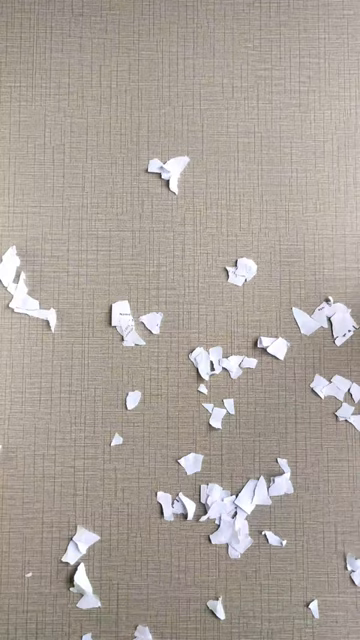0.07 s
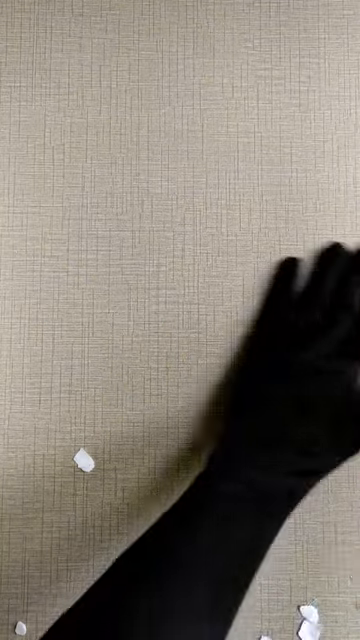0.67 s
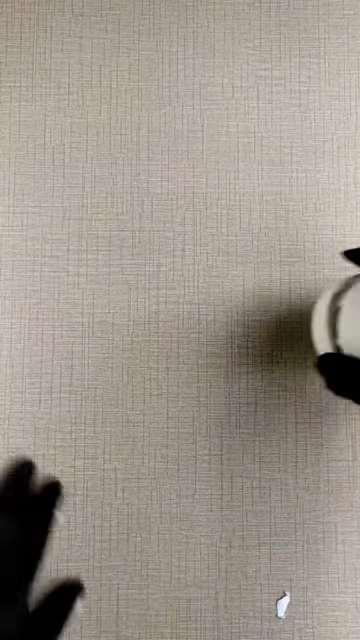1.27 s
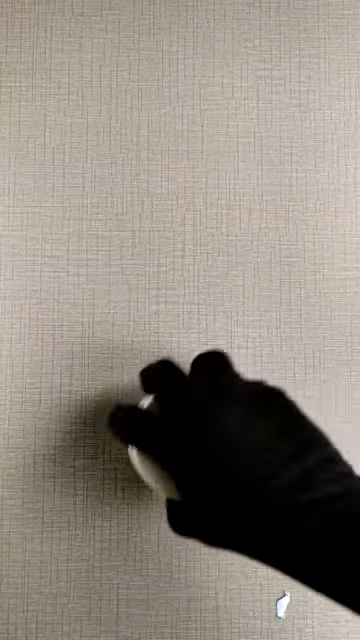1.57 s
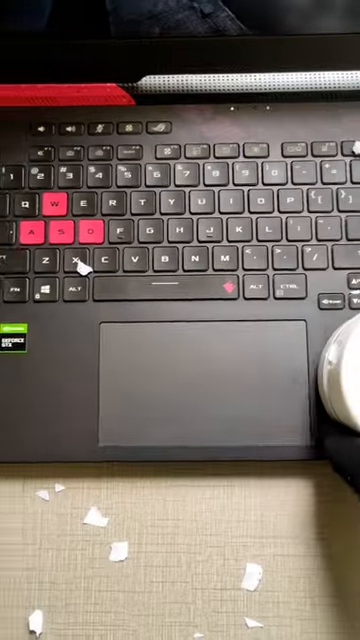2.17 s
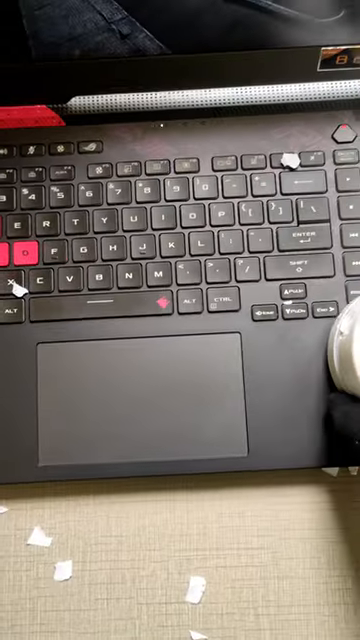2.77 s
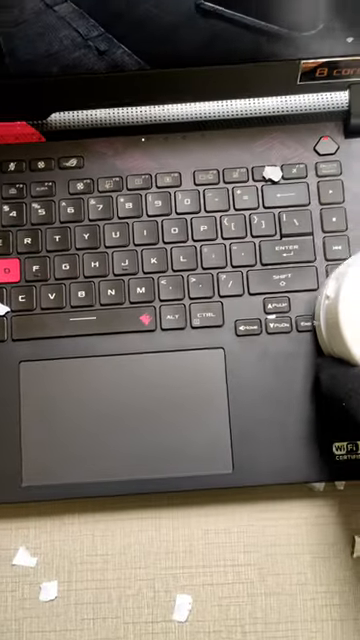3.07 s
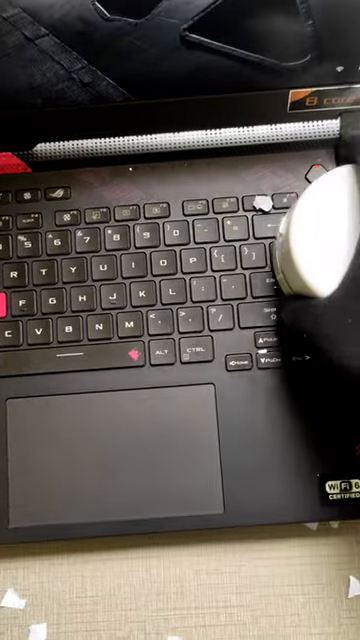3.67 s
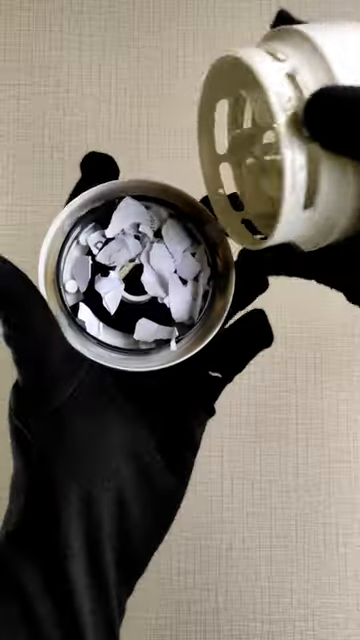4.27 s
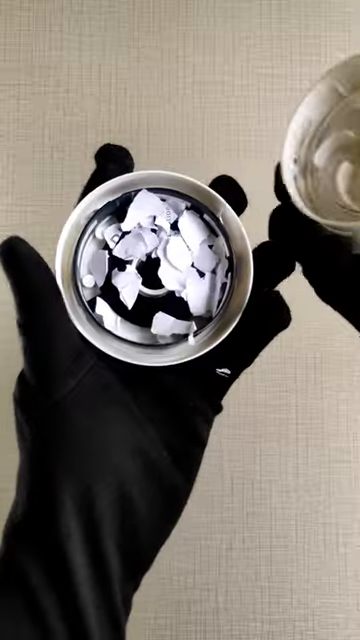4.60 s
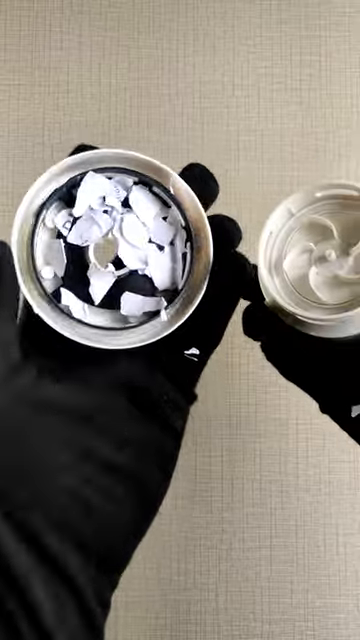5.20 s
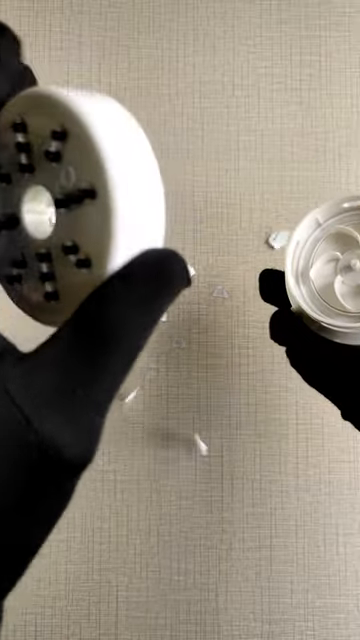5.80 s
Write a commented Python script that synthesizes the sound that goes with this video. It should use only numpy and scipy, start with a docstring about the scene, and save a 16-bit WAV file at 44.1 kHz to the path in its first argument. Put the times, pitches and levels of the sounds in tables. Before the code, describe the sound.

Heard up close in a quiet room, the airy hiss of a palm-sized vacuum is joined by a bright, grainy rattle of paper bits spinning in a plastic cup. The brush scrubs and squeaks over a desk, where the housing thumps softly, and then over a laptop keyboard. Hiss and rattle cut off together. The scraps shift faintly, and near the end they spill out in a short, soft patter.

```python
"""A desk in a quiet room: a palm-sized vacuum hisses in the air, then sweeps paper scraps off the desk
and along a laptop. The scraps whirl, rustle and clack in the plastic dust cup, ringing its wall and air;
the brush scrubs and squeaks, and the housing bumps the desk top into a soft boom. The fan stops, the cup
is tipped out and the scraps patter down. One close echo colours everything."""
import sys
import numpy as np
from scipy import signal
from scipy.fft import rfft, irfft, next_fast_len
from scipy.io import wavfile
from scipy.ndimage import uniform_filter1d

SR = 44100
rng = np.random.default_rng(int(sys.argv[2]) if len(sys.argv) > 2 else 0)


def unload_audio(sound):
    """Save the sound as a 16-bit wav file, at the path given as the first command line argument."""
    columns = np.transpose(np.atleast_2d(sound))
    # keep every value between -1 and 1, then stretch to whole-number steps
    steps = np.round(np.clip(columns, -1, 1) * 32767)
    wavfile.write(sys.argv[1], SR, steps.astype(np.int16))


N = 266584
SWEEP_S, LAPTOP_S, STOP_S = 0.606, 2.132, 4.122
CROSSFADE_S = 0.027  # from desk to laptop


def sweeping():
    """Whirling scraps rustle and ring the cup's wall and air; the scrubbing brush rings the housing."""
    scraps = contacts(per_s=300, spread_db=2.4, grain_s=0.0025, smooth_share=0.25)
    bristles = contacts(per_s=660, spread_db=3.5, grain_s=0.00086, smooth_share=0.25)
    rattle = rustle(scraps) + cup_wall(scraps) + brush(bristles) + cup_air(scraps)
    return butter(rattle, 350, "high")


# Level ride of the scraps circling in the cup: time_s, level_db
CHURN_RIDE = [(.62, -28.5), (.89, -31), (1.12, -27), (1.3, -25), (1.42, -28.5), (1.6, -25), (1.86, -29.5),
              (2.12, -27), (2.4, -23), (2.8, -28.5), (2.87, -23.5), (3.12, -24), (3.29, -21.5), (3.52, -30),
              (3.68, -25), (4.03, -29)]
# Clumps sucked in: start_s, level_db, length_s, wall_send_db
CLUMP_GULPS = [(0.762, -23.5, 0.076, 3), (0.915, -34.5, 0.018, 16), (0.958, -28, 0.052, -17),
               (1.055, -26, 0.036, 1.5), (1.165, -25.5, 0.062, -1), (1.225, -26, 0.048, -2.5),
               (1.321, -28.5, 0.059, 7.5), (1.617, -24.5, 0.035, 3.5), (1.916, -25.5, 0.11, 7),
               (2.136, -21, 0.025, 3), (2.342, -22.5, 0.056, -15), (2.832, -25.5, 0.034, 11.5),
               (2.984, -25, 0.045, 7), (3.358, -34.5, 0.1, 20), (3.538, -35, 0.041, 14.5),
               (3.806, -27, 0.043, 11), (3.94, -35.5, 0.042, 15.5), (4.053, -30, 0.063, 9)]
def suction():
    """Airflow churns the scraps and gulps in clumps: gains of churn, gulps and gulps on the wall."""
    gulps, wall_gulps = 0, 0
    for start_s, level_db, length_s, wall_send_db in CLUMP_GULPS:
        gulp = from_db(level_db) * swell(start_s, length_s, attack_s=0.012, release_s=0.02)
        gulps += gulp
        wall_gulps += from_db(wall_send_db) * gulp
    return from_db(ride(CHURN_RIDE)), gulps, wall_gulps


# Paper EQ on each surface: freq_hz, left_db, right_db
DESK_RUSTLE_EQ = [(351, -11.5, -17), (776, -20, -15.5), (2220, 10, 3.5), (2750, 15.5, 11), (3200, 12.5, 10),
                  (3900, 8.5, 3.5), (4240, 11.5, 7), (4950, 8.5, 1), (5196, 5, 10), (5185, 9.5, -2),
                  (7160, 6, 6.5), (8380, 12.5, -4), (10250, 5, -8), (12820, -0.5, -8), (14460, -14, -27.5)]
LAPTOP_RUSTLE_EQ = [(402, -24, -22.5), (760, -1, -21), (2340, -1.5, 11), (3620, 12.5, 11.5), (4150, -14, 9),
                    (5360, 14.5, 15.5), (6160, -17, 12.5), (7260, -0.5, 16), (7980, 6, 0), (8400, -2, 0),
                    (10370, -10.5, -2), (14000, -11.5, -6.5)]
def rustle(scraps):
    """Whirling paper makes a bright, grainy rustle flecked with ticks."""
    churn, gulps, _ = suction()
    ticks = paper_ticks(per_s=420, spread_db=3.0, t60_s=.027)
    grains = nozzle_gap(scraps * stereo_noise(0.19) + .6 * ticks)
    desk = from_db(-1.5) * coloured(grains, DESK_RUSTLE_EQ) * panned(0.62 * (position() - 7.5))
    laptop = from_db(-4.5) * coloured(grains, LAPTOP_RUSTLE_EQ) * panned(0.34 * (position() + 9.5))
    return np.hypot(churn, gulps) * desk_to_laptop(desk, laptop)


# High overtones of the cup: pitch_hz
TICK_PITCHES = [3765, 4415, 4545, 4740, 5606, 5935, 6138, 6353, 6900, 8510, 9040, 11200]
def paper_ticks(per_s, spread_db, t60_s):
    """Stiff paper corners tick on the plastic, each ringing one overtone; rms 1."""
    count = int(per_s * N / SR)
    when, spot, size, life, *phases = rng.random((4000, 6))[:count].T[:, :, None]
    age = np.arange(SR // 40) / SR
    hz = np.array(TICK_PITCHES)[(spot * len(TICK_PITCHES)).astype(int)]
    hz = hz * (1 + .015 * rng.standard_normal(hz.shape))  # slight detune
    fade = from_db(-spread_db * np.log(size + .02) - 60 * age / (t60_s * (.5 + life)))
    samples = (when * N).astype(int) + np.arange(len(age))
    sides = [fade * np.sin(2 * np.pi * (hz * age + phase)) for phase in phases]
    return rms_one(np.array([np.bincount(samples.ravel(), side.ravel(), N)[:N] for side in sides]))


# Cup wall modes on each surface: pitch_hz, width_hz, level_db
DESK_WALL_MODES = [(4310, 48, 2), (4907, 53, 5), (4950, 91, 4)]
LAPTOP_WALL_MODES = [(4215, 70, 2), (4320, 85, 4), (4540, 280, 2), (4830, 130, 0), (4965, 50, -1)]
def cup_wall(scraps):
    """Scraps pelt the plastic wall and keep it ringing."""
    churn, _, wall_gulps = suction()
    level = np.hypot(surface_gain(desk_db=-1, laptop_db=4) * churn, wall_gulps)
    desk = from_db(-3.5) * body(DESK_WALL_MODES, scraps, alike=0.49) * panned(1.5)
    laptop = from_db(-5.0) * body(LAPTOP_WALL_MODES, scraps, alike=0.11) * panned(-4.5)
    return level * desk_to_laptop(desk, laptop)


# Air modes of the cup at rest: pitch_hz, width_hz, level_db
AIR_MODES = [(2852, 85, -4), (3020, 96, 5.5), (3110, 64, 4)]
# Their centre glides as the nozzle tilts and fills: time_s, pitch_hz
AIR_GLIDE = [(.62, 2953), (1.45, 2967), (1.65, 3029), (2.1, 3090), (2.3, 3010), (4.1, 2982)]
AIR_REST_HZ = 3010
def cup_air(scraps):
    """The air in the cup rings with the churn and gulps, and is pumped by each shove."""
    churn, gulps, _ = suction()
    whirl = np.hypot(churn, 0.86 * gulps) * surface_gain(desk_db=1.5, laptop_db=-4)
    pumping = shoves() * surface_gain(desk_db=7, laptop_db=-5.5)
    level = np.hypot(whirl, pumping) * from_db(-3.0 + 1.2 * drift(20))
    ring = level * body(AIR_MODES, scraps, alike=0.13) * panned(0.74 * position() + 0.71)
    glide = np.exp(2j * np.pi * np.cumsum(ride(AIR_GLIDE) - AIR_REST_HZ) / SR)  # frequency shift
    return np.real(signal.hilbert(ring, next_fast_len(N))[:, :N] * glide)


# Larger scraps hitting the cup: start_s, level_db, pitch_hz, ring_t60_s
SCRAP_HITS = [(.7615, -6, 4950, 0.057), (0.9165, -12.5, 4857, 0.12), (0.9643, -16, 3010, .04),
              (1.072, -8, 3100, 0.026), (1.2639, -8.5, 4930, 0.024), (1.4973, -6, 4950, 0.031),
              (1.556, -12, 4950, 0.04), (1.6291, -10.5, 3020, 0.14), (1.9113, -12.5, 3010, 0.072),
              (1.949, -9, 3110, 0.073), (2.9473, -18, 4396, 0.026), (3.0023, -8, 4280, .04),
              (3.0589, -10.5, 3780, 0.027), (3.1367, -27, 5400, .02), (3.3828, -5, 4310, 0.011),
              (3.39, -6.5, 4310, 0.035), (3.4262, -15, 4205, 0.05), (3.732, -12, 4740, 0.047)]
def strikes(clack_db, ring_db):
    """A larger scrap hits the cup: a short, round clack and one strong ring."""
    clacks = sum(from_db(db) * burst(s, t60 / 2) for s, db, _, t60 in SCRAP_HITS) * stereo_noise(.3)
    clacks = butter(butter(clacks, [2600, 7800]), [2600, 7800])
    rings = sum(from_db(db) * burst(s, t60, hz) for s, db, hz, t60 in SCRAP_HITS)
    rings = butter(rings, [2000, 7000])
    return (from_db(clack_db) * clacks + from_db(ring_db) * rings) * panned(0.51 * position())


# How hard the brush bears down: time_s, level_db
PRESSURE_RIDE = [(.62, -36), (.92, -53), (1.2, -41), (1.55, -35), (1.7, -28), (2.1, -33.5), (2.4, -29),
                 (2.76, -39.5), (3.3, -38.5), (3.5, -27.5), (3.85, -33.5), (4.1, -32)]
# Housing modes on each surface: pitch_hz, width_hz, level_db
DESK_HOUSING = [(887, 31, -15), (1145, 50, -6.5), (1425, 18, -12.5), (1417, 44, -4), (1513, 290, -9),
                (2020, 73, -8)]
LAPTOP_HOUSING = [(866, 30, -10), (1172, 85, 1.5), (1321, 39, 6), (1503, 73, 5), (1958, 68, 3),
                  (2130, 52, 2)]
def brush(bristles):
    """Bristles scrub the surface and ring the housing, louder under pressure."""
    level = np.hypot(from_db(ride(PRESSURE_RIDE)), shoves())
    desk = from_db(-3.5) * body(DESK_HOUSING, bristles, alike=0.35, swing_db=7) * panned(.3)
    laptop = from_db(-1.07) * body(LAPTOP_HOUSING, bristles, alike=0.2, swing_db=7) * panned(-0.78)
    return level * desk_to_laptop(desk, laptop)


# Pushes of the brush: start_s, level_db, length_s
BRUSH_SHOVES = [(1.597, -24, 0.044), (1.716, -27.5, 0.021), (1.933, -34.5, 0.13), (2.326, -27.5, 0.059),
                (3.386, -28.5, 0.055)]
def shoves():
    """Gain that surges as the brush is shoved over the surface."""
    return sum(from_db(level_db) * swell(start_s, length_s, attack_s=0.027, release_s=0.018)
               for start_s, level_db, length_s in BRUSH_SHOVES)


# The brush rim or a caught scrap squeaks: centre_s, level_db, pitch_hz, length_s
SQUEAK_CUES = [(0.625, -30, 1410, 0.035), (0.791, -32, 1410, 0.073), (1.019, -34, 1450, 0.08),
               (1.632, -20, 3015, .055), (1.676, -33, 1185, 0.08), (1.732, -22.5, 3015, .045),
               (2.009, -32, 1290, 0.035), (2.72, -38, 1935, 0.14), (2.845, -13.5, 4312, .024),
               (2.92, -34, 1940, .1), (3.035, -33, 1940, 0.07), (3.413, -35, 865, 0.06),
               (3.425, -28, 1400, 0.06), (3.49, -24, 4312, .06), (3.672, -26, 4960, .035)]
def squeaks(wander_hz, rough_db):
    """Stick and slip holds one resonance of the housing or cup in a short, rough tone."""
    tones, t = 0, np.arange(N) / SR
    wander = np.cumsum(wander_hz * drift(150)) / SR
    for centre_s, level_db, pitch_hz, length_s in SQUEAK_CUES:
        arch = np.cos(np.pi * np.clip((t - centre_s) / length_s, -.5, .5))
        tones += from_db(level_db) * arch * np.sqrt(2) * np.sin(2 * np.pi * (pitch_hz * t + wander))
    roughness = from_db(rough_db * np.array([drift(150), drift(120)]))
    return tones * roughness * panned(.2 * position())


# Soft knocks on the desk, and one deep puff of air on the microphone: start_s, level_db, pitch_hz, t60_s
LOW_THUMPS = [(0.253, -31, 105, 0.1), (0.7, -31.5, 105, 0.27), (0.736, -27.5, 36.7, 0.5),
              (0.746, -24, 88.5, 0.15), (0.844, -25, 90.4, 0.18), (1.223, -25.5, 94, 0.14),
              (1.603, -26.5, 107, 0.34), (1.634, -20, 85.7, 0.24), (1.778, -37, 105, 0.43)]
# Upper desk modes: pitch_hz, level_db, t60_s
UPPER_DESK_MODES = [(251.5, -13.5, 0.14), (293.7, -12.5, 0.18)]
def thumps(attack_s):
    """Soft desk knocks and one puff of air boom low, with a dull shudder under the ring."""
    boom, shudder = 0, 0
    for start_s, level_db, pitch_hz, t60_s in LOW_THUMPS:
        firmness = min(t60_s / 0.17, 1) ** 2  # a damped thump hardly reaches the upper modes
        upper = sum(from_db(db) * burst(start_s, t60, hz) for hz, db, t60 in UPPER_DESK_MODES)
        ring = burst(start_s, t60_s, pitch_hz) + firmness * upper
        boom += from_db(level_db) * ring * fade_in(start_s + attack_s / 2, attack_s)
        shudder += from_db(level_db) * burst(start_s, 2.1 * t60_s)
    shudder = butter(shudder * stereo_noise(0.15), [68, 170])
    return (butter(boom, [36, 300]) + from_db(9.0) * shudder) * panned(1.2)


# Level ride of the patter: time_s, level_db
POUR_RIDE = [(4.12, -63), (4.218, -61.5), (4.3, -77.5), (5.803, -73.5), (5.808, -59), (5.818, -47.5),
             (5.853, -55.5), (5.861, -48.5), (5.92, -59.5), (6.04, -64)]
# Patter EQ: freq_hz, left_db, right_db
POUR_EQ = [(694, 4.5, -4.5), (1504, -3, 10.5), (2200, -1, 2.5), (2928, 10.5, 8.5), (3660, 4.5, 5.5),
           (4300, 13, 13.5), (6000, 3.5, 8.5), (7300, -1, 13), (9010, 6, -1.5), (14100, -12, -6)]
def pouring():
    """Loose scraps shift in the cup, then slide out and patter onto the desk."""
    patter = contacts(per_s=1500, spread_db=2.5, grain_s=0.00066, smooth_share=.35)
    return coloured(from_db(ride(POUR_RIDE)) * patter * stereo_noise(.15), POUR_EQ)


# Air hiss EQ: freq_hz, left_db, right_db
FAN_EQ = [(280, -41, -42), (750, -41, -41.5), (2530, -40, -40.5), (2848, -36.5, -34.5), (3500, -42, -42.5),
          (5100, -42, -40.5), (6500, -44, -46), (7470, -44, -48), (8930, -38, -51), (9900, -50, -51),
          (11510, -49, -58), (14000, -56, -57)]
# Vent whistles: pitch_hz, width_hz, left_db, right_db
VENT_WHISTLES = [(955, 55, -65, -61.5), (1202, 25, -62, -66), (1270, 24, -51, -60.5),
                 (2940, 36, -56, -63.5), (3120, 30, -61, -61.5), (8300, 45, -52.5, -61.5)]
def fan():
    """Air rushes through the impeller and whistles faintly in the vents."""
    air = coloured(stereo_noise(0.3), FAN_EQ) * from_db(1.5 + drift(12))
    for pitch_hz, width_hz, left_db, right_db in VENT_WHISTLES:
        whistle = rms_one(steep_resonance(stereo_noise(0.056), pitch_hz, width_hz))
        air += from_db([[left_db], [right_db]]) * whistle
    return air


# Room tone EQ: freq_hz, left_db, right_db
ROOM_EQ = [(25, -33, -29), (60.04, -25, -24.5), (105, -35, -19.5), (180, -35.5, -32), (406, -42, -45.5),
           (906, -57, -49.5), (1380, -48, -47.5), (2548, -65, -61.5), (2860, -55.5, -51.5),
           (3600, -67.5, -63), (4400, -57, -57), (6570, -75, -62.5), (9520, -77.5, -71.5),
           (13440, -83, -64.5)]
def room():
    """A bed of low rumble and faint hiss."""
    return from_db(-1.6) * coloured(stereo_noise(0.29), ROOM_EQ)


# Reflections between nozzle and surface: delay_s, gain
GAP_REFLECTIONS = [(.0011, .45), (.0027, -.5)]
def nozzle_gap(x):
    """The gap under the nozzle wobbles with the hand, so its reflections shift the colour; rms 1."""
    samples = np.arange(N)
    for delay_s, gain in GAP_REFLECTIONS:
        read = samples - delay_s * SR * (1 + .035 * drift(4))
        x = x + gain * np.array([np.interp(read, samples, side) for side in x])
    return rms_one(x)


# Bands the hollow housing swallows: freq_hz, width_hz
CAVITY_NOTCHES = [(2480, 380), (3400, 220)]
def cavity(x, depth):
    """The cavity cuts dips between its resonances."""
    for freq_hz, width_hz in CAVITY_NOTCHES:
        x = x - depth * resonance(x, freq_hz, width_hz)
    return x


# The vacuum's path from left to right: time_s, left_over_right_db
PAN_RIDE = [(.6, 2.5), (1.9, 4.5), (2.12, 10.5), (2.15, -6.5), (2.4, -8.5), (3.3, -12), (3.65, -19)]
def position():
    """The pan curve in dB, which each moving layer scales to its own width."""
    return ride(PAN_RIDE)


def desk_to_laptop(desk, laptop):
    """Equal-power crossfade; off to the right on the laptop, the sound reaches the left side later."""
    moved = fade_in(LAPTOP_S, CROSSFADE_S)
    laptop = np.array([delayed(laptop[0], 4 / SR), laptop[1]])
    return desk * np.sqrt(1 - moved) + laptop * np.sqrt(moved)


def surface_gain(desk_db, laptop_db):
    """One gain on the desk, another on the laptop."""
    return from_db(desk_db + fade_in(LAPTOP_S, CROSSFADE_S) * (laptop_db - desk_db))


def contacts(per_s, spread_db, grain_s, smooth_share):
    """Envelope of many tiny random impacts of uneven size over a steady rush; rms 1."""
    sizes = from_db(spread_db * np.minimum(rng.exponential(1, N), 4))
    clumping = from_db(4 * drift(35))
    hits = (rng.random(N) < per_s * clumping / SR) * sizes ** 2
    power = signal.lfilter([1], [1, -np.exp(-1 / (grain_s * SR))], hits + 1e-18)
    return np.sqrt(smooth_share + (1 - smooth_share) * power / power.mean())


def body(modes, impacts, alike, swing_db=4.2):
    """Impacts land on ever different spots, so each mode swells and fades on its own; rms 1."""
    out = 0
    for pitch_hz, width_hz, level_db in modes:
        ring = steep_resonance(impacts * stereo_noise(alike), pitch_hz, width_hz)
        out += ring * from_db(level_db + swing_db * drift(16))
    # the modes trade a steady supply of energy among themselves
    power = np.mean(out ** 2, axis=0)
    power = uniform_filter1d(uniform_filter1d(power, SR // 60), SR // 60)
    return out / np.sqrt(np.abs(power) + 1e-18)


def burst(start_s, t60_s, hz=0):
    """Sudden start, exponential decay; with a pitch, a ringing mode."""
    out, start = np.zeros(N), int(start_s * SR)
    age = np.arange(min(SR // 2, N - start)) / SR
    tone = np.sin(2 * np.pi * hz * age) if hz else 1
    out[start:start + len(age)] = from_db(-60 * age / t60_s) * tone
    return out + 1e-18


def swell(start_s, length_s, attack_s, release_s):
    """Quick rise, hold, exponential release."""
    past_end_s = np.maximum(np.arange(N) / SR - start_s - length_s, 0)
    return fade_in(start_s, attack_s) * np.exp(-np.minimum(past_end_s / release_s, 20))


def fade_in(centre_s, fade_s):
    """Rises from 0 to 1 around a moment."""
    return np.clip((np.arange(N) / SR - centre_s) / fade_s + .5, 0, 1)


def ride(points):
    """An automation curve at every sample, held flat beyond its ends."""
    return np.interp(np.arange(N) / SR, *np.transpose(points))


def drift(rate_hz):
    """Smooth random motion with spread 1."""
    knots = rng.standard_normal(N // 20)
    return np.interp(np.arange(N) / SR * rate_hz * 2, np.arange(len(knots)), knots) * np.sqrt(3 / 2)


def stereo_noise(alike):
    """White noise, partly shared by the two sides."""
    return np.sqrt(alike) * rng.standard_normal(N) + np.sqrt(1 - alike) * rng.standard_normal((2, N))


def coloured(x, eq):
    """Minimum-phase EQ with one curve for each side."""
    size = next_fast_len(N + SR // 4, real=True)
    size += size % 2
    hz, *sides = np.transpose(eq)
    log_hz = np.log(np.maximum(np.fft.rfftfreq(size, 1 / SR), 1))
    cepstrum = irfft([np.log(from_db(np.interp(log_hz, np.log(hz), side))) for side in sides])
    cepstrum[:, 1:size // 2] *= 2  # folding makes the filter causal
    cepstrum[:, size // 2 + 1:] = 0
    return irfft(rfft(x, size) * np.exp(rfft(cepstrum)))[:, :N]


def resonance(x, hz, width_hz):
    """Two-pole resonance with gain 1 on top."""
    radius = np.exp(-np.pi * width_hz / SR)
    feedback = [1, -2 * radius * np.cos(2 * np.pi * hz / SR), radius ** 2]
    return signal.lfilter(np.array([1, 0, -1]) * (1 - radius ** 2) / 2, feedback, x + 1e-18)


def steep_resonance(x, hz, width_hz):
    """Two double-width resonances in series, for steeper skirts."""
    return resonance(resonance(x, hz, 2 * width_hz), hz, 2 * width_hz)


def butter(x, edges_hz, kind="band"):
    """Gentle filter, 12 dB per octave."""
    return signal.sosfilt(signal.butter(2, edges_hz, kind, fs=SR, output="sos"), x)


def delayed(x, lag_s):
    """The same signal a little later, by a phase ramp."""
    size = next_fast_len(N + SR // 10, real=True)
    ramp = np.exp(-2j * np.pi * np.fft.rfftfreq(size, 1 / SR) * lag_s)
    return irfft(rfft(x, size) * ramp, size)[:N]


def panned(db):
    """Left and right gains for a level difference."""
    return from_db(np.array([[.5], [-.5]]) * db)


def from_db(db):
    """Decibels to gain."""
    return 10 ** (np.asarray(db) / 20)


def rms_one(x):
    """Scale to unit power."""
    return x / np.sqrt(np.mean(x ** 2) + 1e-20)


ECHO_S, ECHO_GAIN = .009286, .46
def scene():
    """The vacuum at work, the emptying, the room and one close echo."""
    rattle = fade_in(SWEEP_S, 0.032) * sweeping() + strikes(clack_db=-2.5, ring_db=-3.0)
    cleaning = cavity(rattle, depth=.6) + squeaks(wander_hz=48, rough_db=3.5)
    running = 1 - fade_in(STOP_S, 0.02)
    direct = running * (cleaning + fan()) + thumps(attack_s=.014) + pouring() + room()
    echo = np.array([delayed(side, ECHO_S) for side in direct])
    return (direct + ECHO_GAIN * echo) * from_db(-1.61)


CUTOFF_HZ = 14400
def record(dry):
    """Soft saturation rounds the peaks; a steep low-pass cuts the top."""
    return signal.sosfilt(signal.ellip(12, .1, 90, CUTOFF_HZ, fs=SR, output="sos"), np.tanh(dry))


dry = scene()
out = record(dry)
unload_audio(out)
```